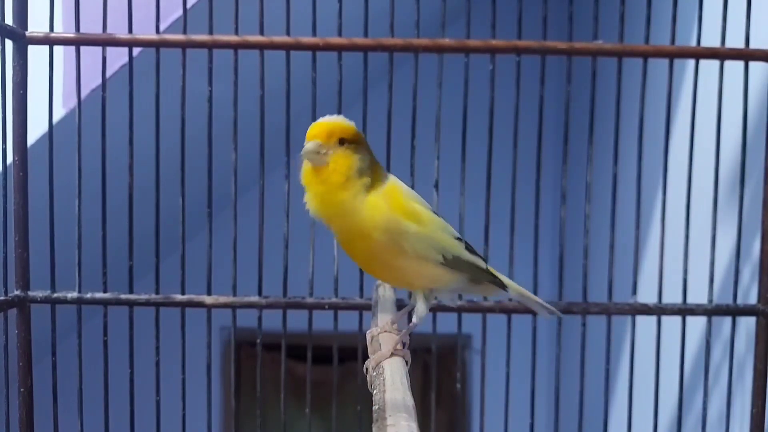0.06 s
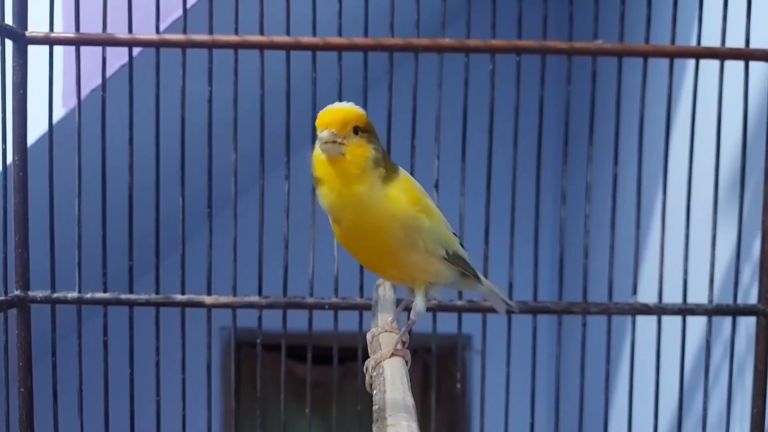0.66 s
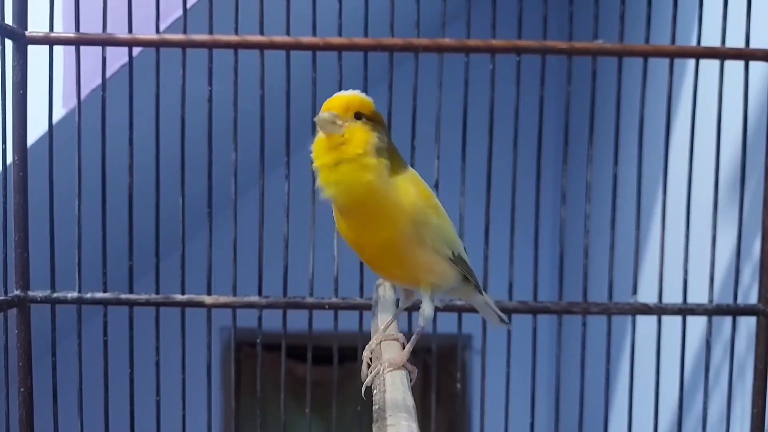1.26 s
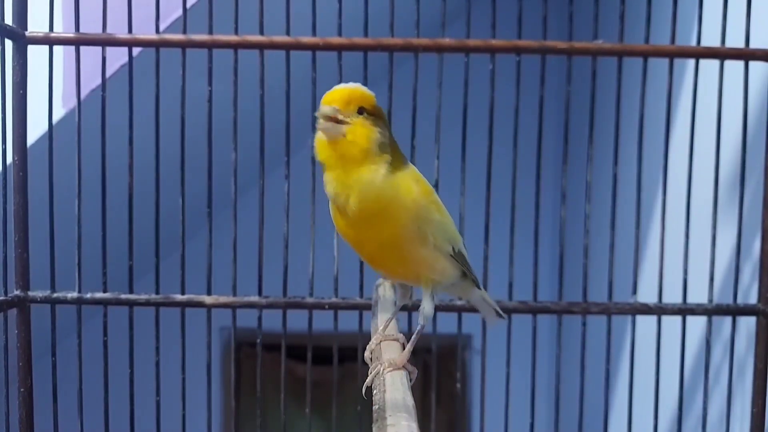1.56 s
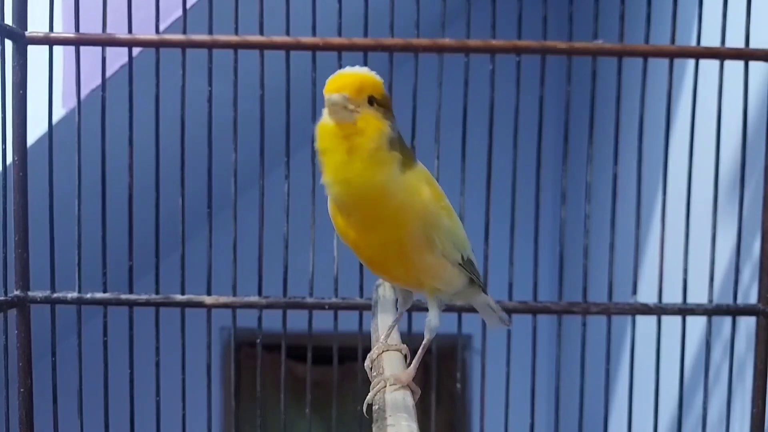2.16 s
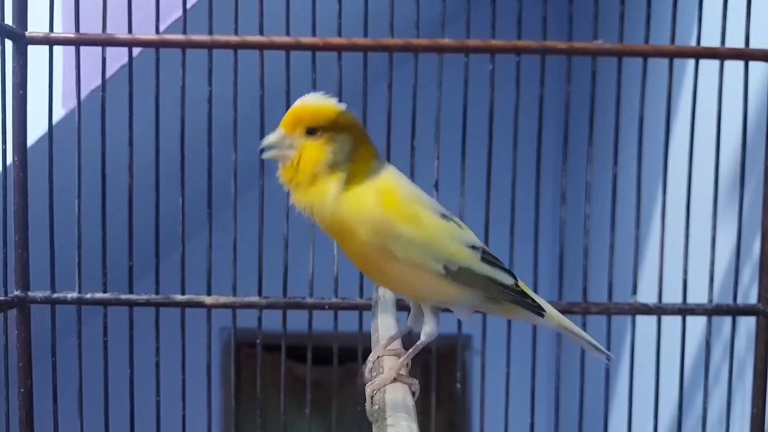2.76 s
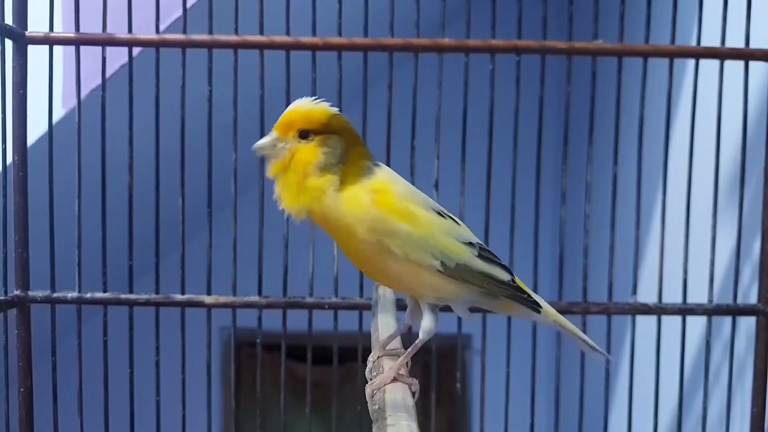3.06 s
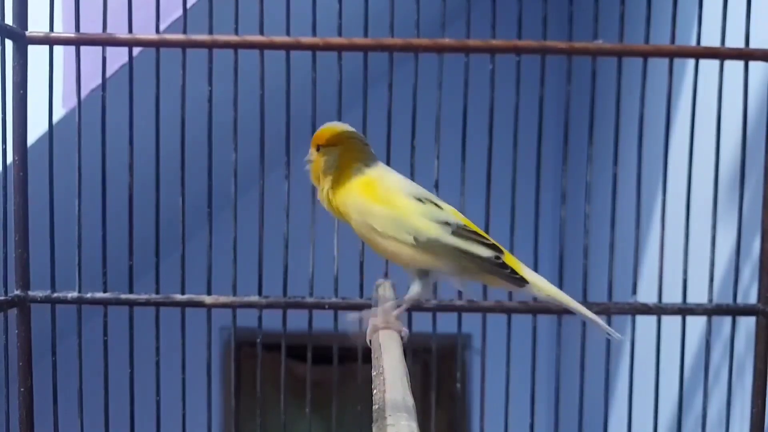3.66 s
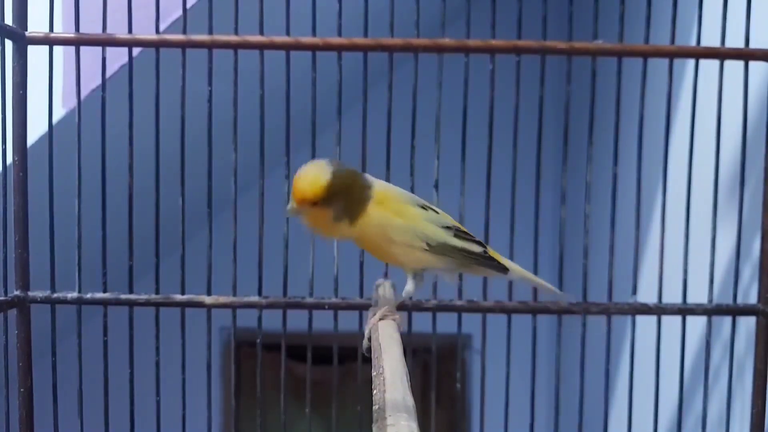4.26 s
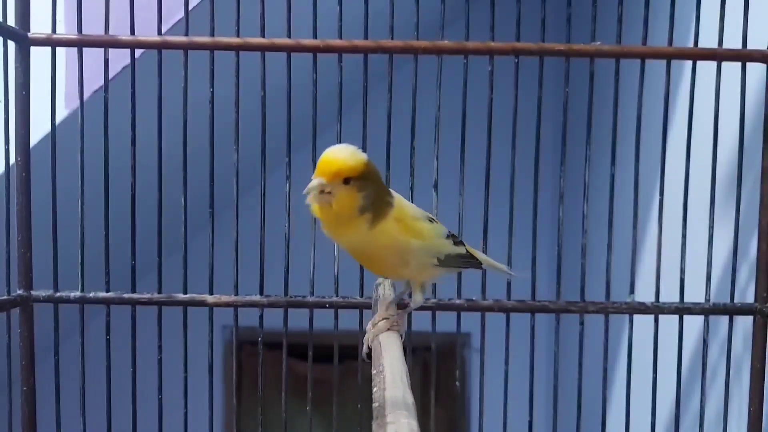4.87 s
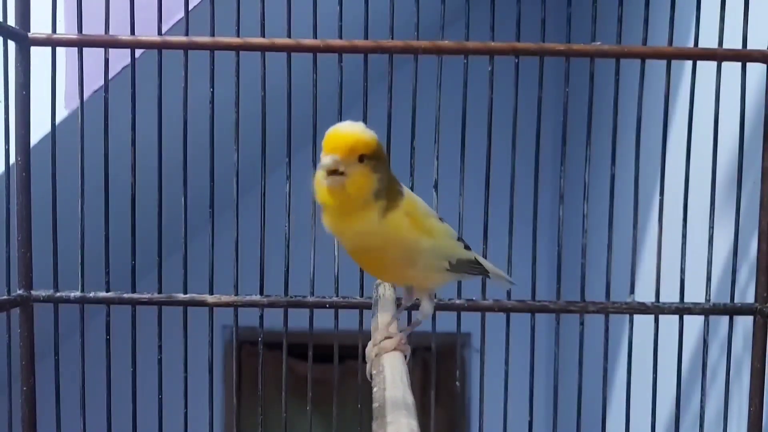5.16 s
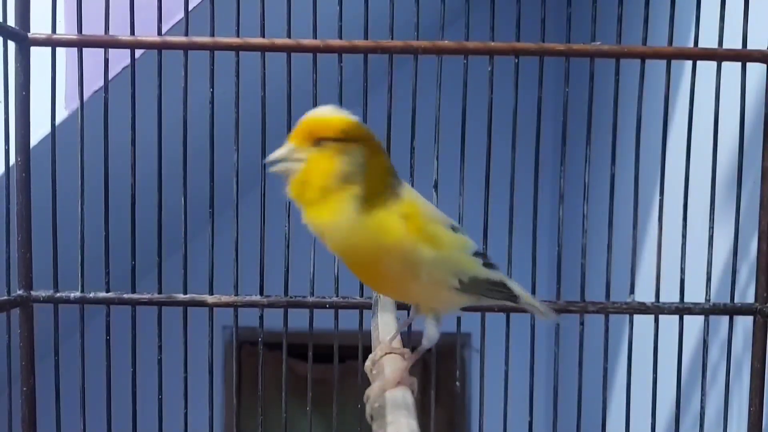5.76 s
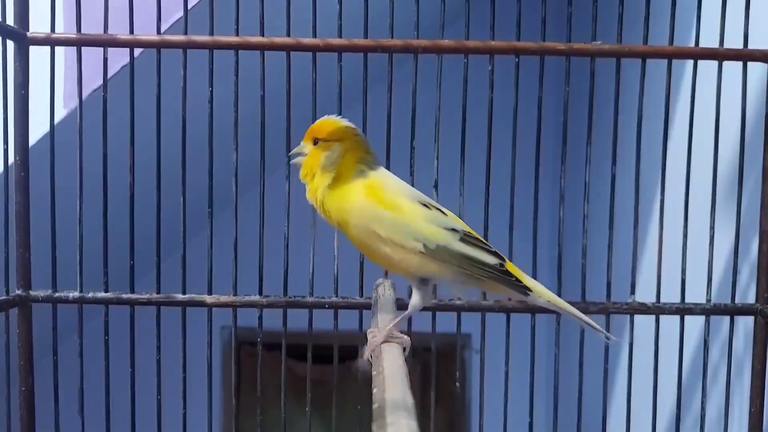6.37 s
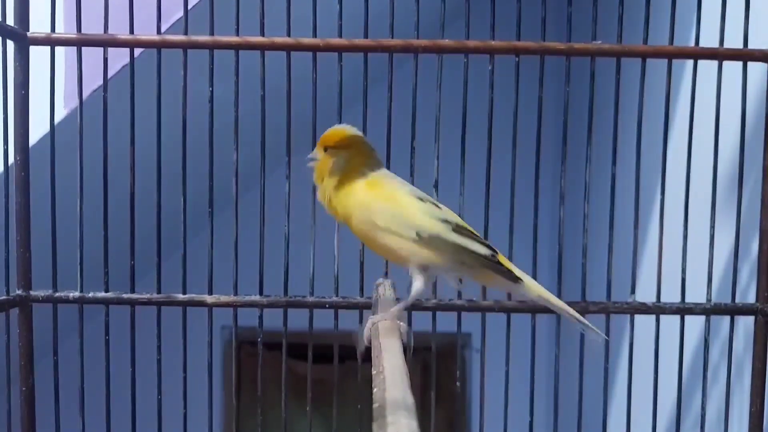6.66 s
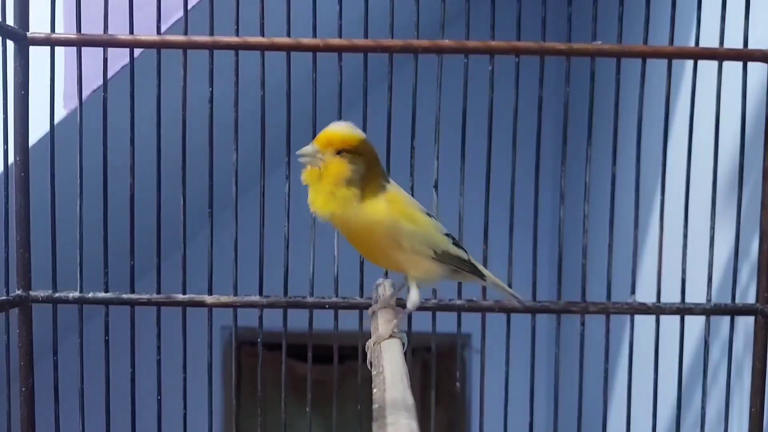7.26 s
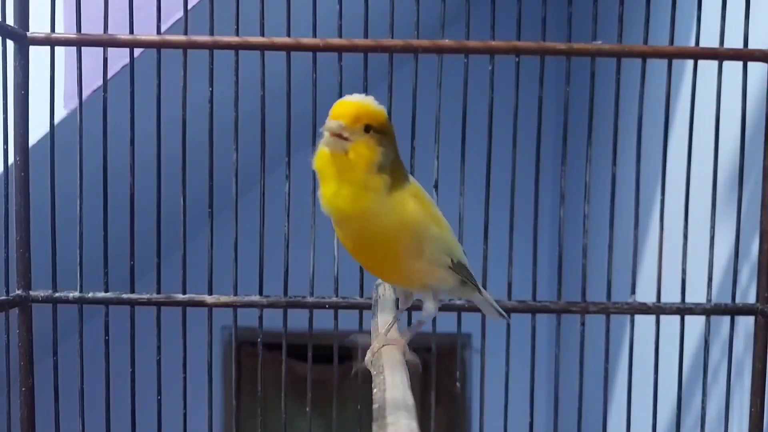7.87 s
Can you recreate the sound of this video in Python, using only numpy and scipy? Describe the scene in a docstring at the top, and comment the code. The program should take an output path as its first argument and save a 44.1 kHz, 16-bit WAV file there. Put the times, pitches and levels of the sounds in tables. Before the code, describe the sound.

Close, continuous canary song indoors moves from a rapid trill through falling chirps to long whistles, with light echo and quiet hum.

```python
"""A caged canary in a small room

The bird sings close by: a fast trill, a long run of steep down-sweeps, four rising whistles and
four slow falling ones. Each phrase repeats one learned syllable, a gliding tone of the syrinx
whose overtones are filtered by throat and beak, followed by the echoes of the room.
Mains hum, a drone, low rumble and faint hiss lie underneath, and a distant engine winds down."""
import sys
import numpy as np
from scipy import signal
from scipy.fft import rfft, irfft, next_fast_len
from scipy.io import wavfile
from scipy.ndimage import uniform_filter1d, map_coordinates

SR = 44100
rng = np.random.default_rng(int(sys.argv[2]) if len(sys.argv) > 2 else 0)


def put_to_file(sound):
    """Save the sound as 16-bit audio at rate SR, in the file named by the first command-line argument."""
    columns = np.atleast_2d(sound).T  # one column per channel
    safe = np.clip(columns, -1, 1)
    whole_steps = np.round(safe * 32767)
    wavfile.write(sys.argv[1], SR, whole_steps.astype(np.int16))


N = 357651


def amp(db):
    """Amplitude ratio of a level in decibels."""
    return 10 ** (np.asarray(db) / 20)


def unit(x):
    """Normalisation to an rms of 1."""
    return x / np.sqrt(np.mean(x ** 2) + 1e-20)


def along(points, hz):
    """Interpolation of (Hz, value) points on a logarithmic frequency axis."""
    freqs, values = np.transpose(points)
    return np.interp(np.log(hz + 1), np.log(freqs + 1), values)


def curves(rows, t):
    """Linear interpolation, at the times t, of each column after the time column."""
    times, *columns = np.transpose(rows)
    return [np.interp(t, np.sort(times), column) for column in columns]


def wobble(rate, size):
    """Random modulation: a smooth curve with `rate` knots a second."""
    knots = rng.standard_normal(int(size * rate / SR) + 4)
    return map_coordinates(knots, [np.arange(size) * rate / SR])


def filtered(x, response):
    """Zero-phase filtering: the spectrum times a frequency response."""
    size = next_fast_len(N + 8192)
    return irfft(rfft(x, size) * response(np.fft.rfftfreq(size, 1 / SR)), size)[..., :N]


def noise_pair(size, side_db):
    """Partly coherent stereo noise: a common part plus or minus a weaker side part."""
    mid, side = rng.standard_normal((2, size))
    return unit(np.array([mid + amp(side_db) * side, mid - amp(side_db) * side]))


def add(out, sound, s):
    """Superposition of a stereo sound, starting at s seconds."""
    start = round(s * SR)
    part = sound[:, max(-start, 0):max(N - start, 0)]
    out[:, max(start, 0):][:, :part.shape[1]] += part


def noise_bed(spectrum, side_db):
    """Spectral shaping: stereo white noise filtered to a spectrum, at an rms of 1."""
    return unit(filtered(noise_pair(N, side_db), lambda hz: amp(along(spectrum, hz))))


def hiss():
    """Stationary broadband noise, heard as a faint hiss."""
    # Each row: frequency in Hz, relative spectral density in dB.
    spectrum = [(500, -8.5), (1500, -9), (4000, -8), (8000, -24), (15000, -10.5)]
    return amp(-61) * noise_bed(spectrum, side_db=-7)


def rumble():
    """Low-frequency noise under a slow envelope."""
    # Each row: frequency in Hz, relative spectral density in dB.
    spectrum = [(25, -21.5), (48, -10), (78, -5), (100, -5.5), (118, -2), (135, -13), (179, -3.5),
                (209, -10.5), (302, -12), (358, -17.5), (527, -29.5), (1400, -44.5), (3000, -91)]
    # Each row: time in seconds, level in dB.
    envelope = [(0, -50), (1.4, -51), (2.2, -48.5), (4.1, -48), (5.9, -53), (8.1, -55.5)]
    db, = curves(envelope, np.arange(N) / SR)
    return amp(db) * noise_bed(spectrum, side_db=-13)


def low_tone(hz, envelope, waver_db, drift_rad):
    """A sinusoid under random amplitude and phase modulation."""
    t = np.arange(N) / SR
    db, = curves(envelope, t)
    peak = np.sqrt(2) * amp(db + waver_db * wobble(10, N))
    return peak * np.sin(2 * np.pi * hz * t + drift_rad * wobble(2.7, N))


def hum():
    """Two wavering spectral lines: a low drone, and mains hum at twice the supply frequency."""
    # Each row of both: time in seconds, relative level in dB.
    drone_envelope = [(0, -54), (.9, -59), (1.3, -70), (1.6, -48.5), (4, -52.5), (5, -57), (6.3, -48.5),
                      (8, -50)]
    mains_envelope = [(0, -48.5), (1.1, -67), (2.7, -49), (4.2, -47.5), (5.4, -52), (8, -52.5)]
    drone = low_tone(59.9, drone_envelope, waver_db=4.5, drift_rad=1.8)
    mains = low_tone(99.9, mains_envelope, waver_db=3, drift_rad=0.94)
    return amp(-3) * drone + amp(-0.5) * mains


def engine(idle_hz=36, sag_hz_per_s=13.5, attack_db_per_s=134, release_db_per_s=32, rough_rad=1.1):
    """Exhaust harmonics of a distant engine: each of two revs swells, sags towards idle and fades."""
    # Each row: time of full level in seconds, firing rate then in Hz, hold in seconds, level in dB.
    revs = [(1.46, 50.67, 0.16, -46.5), (2.02, 52.27, 0.39, -44.5)]
    # Each row: multiple of the firing rate, relative level in dB.
    exhaust = [(3, -24), (4, -7.5), (5, 9), (6, -14.5), (7, -29), (8, -8), (9, -15), (10, -10.5)]
    out = np.zeros(N)
    for s, firing_hz, hold_s, db in revs:
        t = np.arange(N) / SR - s
        hz = np.maximum(firing_hz - sag_hz_per_s * t, idle_hz)
        phase = 2 * np.pi * np.cumsum(hz) / SR
        orders = np.zeros(N)
        for multiple, order_db in exhaust:
            gain = amp(order_db + 2.5 * wobble(32, N))
            orders += gain * np.sin(multiple * phase + rough_rad * wobble(23, N))
        fade_db = attack_db_per_s * np.maximum(-t, 0) + release_db_per_s * np.maximum(t - hold_s, 0)
        out += amp(db - fade_db) * unit(orders)
    return out * amp([[-4.8], [3]])


def room_tail(build_s=0.00051):
    """Diffuse reverberation: noise decays exponentially in each band, the lows most slowly."""
    # Each row: frequency in Hz, reverberation time (T60) in seconds.
    decay_times = [(1000, 0.43), (3000, 0.26), (5000, 0.34), (7000, 0.26), (15000, 0.31)]
    # Each row: frequency in Hz, gain in dB.
    colour = [(1000, 3.5), (3000, 0.5), (4500, -4.5), (7000, 2.5), (9000, 3.5), (15000, 2)]
    hz, t, bands = signal.stft(noise_pair(SR // 3, side_db=-2.5), SR, nperseg=256)
    decay = amp(-60 * t / along(decay_times, hz)[:, None])
    _, tail = signal.istft(bands * decay, SR, nperseg=256)
    size = tail.shape[1]
    tail *= 1 - np.exp(-np.arange(size) / (SR * build_s))
    tail /= np.linalg.norm(tail[0])
    return irfft(rfft(tail) * amp(along(colour, np.fft.rfftfreq(size, 1 / SR))))


def ringing(size):
    """Normal modes of cage and room: damped sinusoids that a passing sweep excites."""
    # Each row: frequency in Hz, level in dB, decay time (T60) in seconds.
    modes = [(2352, -52, .35), (2894, -57.5, 0.32), (3250, -55.5, 0.36), (4237, -54, 0.32), (5890, -61, .3),
             (6860, -57.5, 0.23)]
    t = np.arange(size) / SR
    return sum(amp(db - 60 * t / t60) * np.sin(2 * np.pi * hz * t) for hz, db, t60 in modes)


def in_room(note, tail, right_db, flutter_hz=170.5, first_bounce=0.15, bounce_gain=0.74):
    """Convolution with the direct path, early echoes, flutter between parallel walls and the tail."""
    # Each row: delay in seconds, gain as an amplitude ratio.
    early_echoes = [(.0023, 0.032), (0.0156, 0.11)]
    direct = [(0.00034, 0.92)]
    flutter = [(k / flutter_hz, first_bounce * bounce_gain ** (k - 1)) for k in range(1, 12)]
    response = tail * amp([[-right_db / 3], [right_db / 3]])
    for s, gain in direct + early_echoes + flutter:
        response[:, round(s * SR)] += gain * amp([-right_db / 2, right_db / 2])
    return signal.fftconvolve(note[None], response, axes=1)


def syrinx(shape, stretch, bright_db, pitch=1, range_db=(0, 0, 0), waver=0.0025, rasp_db=-48):
    """Source and filter: a gliding whistle with breath noise, its overtones shaped by throat and beak."""
    # Relative levels in dB of the second, third and fourth harmonics, before the throat.
    overtones = [8.5, -1, -14.5]
    # Each row: frequency in Hz, gain of throat and beak for the overtones in dB.
    throat = [(2000, -48), (6000, -52.5), (8000, -40.5), (9500, -27.5), (11000, -23.5), (13000, -27.5),
              (14500, -12.5), (15500, -18)]
    # Air at the syrinx. Each row: frequency in Hz, relative spectral density in dB.
    rasp = [(500, -17.5), (1200, -16), (2500, 1), (5000, -11), (8000, 0), (10000, -2), (15000, 0.5)]
    t = np.arange(shape[0][0], shape[-1][0], 1 / (SR * stretch))
    size = len(t)
    hz, db = (uniform_filter1d(c, size=70, mode="nearest") for c in curves(shape, t))
    # The two sides of the syrinx share the range, so its parts vary in strength on their own.
    high_db, mid_db, low_db = range_db
    db = db + along([(3200, low_db), (3800, 0), (4300, 0), (4700, mid_db), (5900, high_db)], hz)
    hz = hz * pitch * (1 + waver * wobble(246.6, size))
    phase = 2 * np.pi * np.cumsum(hz) / SR
    tone = np.sin(phase)
    for multiple, source_db in enumerate(overtones, 2):
        overtone_db = source_db + bright_db + along(throat, multiple * hz) + 4.4 * wobble(93.8, size)
        anti_alias = np.clip((SR / 2 - multiple * hz) / (SR / 10), 0, 1)
        tone += amp(overtone_db) * np.sin(multiple * phase) * anti_alias
    air_spectrum = rfft(rng.standard_normal(size)) * amp(along(rasp, np.fft.rfftfreq(size, 1 / SR)))
    tone += amp(rasp_db + bright_db) * unit(irfft(air_spectrum, size))
    edges = signal.windows.tukey(size, 0.066)  # long notes start and end more softly
    return tone * edges * amp(db + 1.5 * wobble(119, size))


def beats(tempo, count):
    """Repetition with a changing period: the time of each syllable and the spacing to the next."""
    s = tempo[0][0]
    for _ in range(count):
        spacing, = curves(tempo, s)
        yield s, spacing
        s = s + spacing


def trill(sing, nominal_period_s=0.058, accent_s=0.0128, length_scatter=0.05):
    """Rapid frequency modulation: short falling strokes slow down and end in one longer linking note."""
    # Each row of both: time in the syllable in seconds, pitch in Hz, relative level in dB.
    stroke = [(-.002, 6930, -29), (.001, 6500, -11.5), (.0045, 5720, -18.5), (.008, 4870, -2),
              (.013, 4320, 0.5), (.018, 3570, 1), (0.021, 3330, -13), (.0235, 3230, -30)]
    link = [(0, 6920, -5.5), (.004, 6180, -11.5), (.012, 5160, -12.5), (.022, 4550, -9), (.040, 4170, -21),
            (.058, 3380, -7), (.072, 2750, -4.5), (.080, 1974, -14), (.088, 955, -30)]
    # Each row: time in seconds, syllable spacing in seconds.
    tempo = [(.0115, .04475), (.8155, .05016), (1.023, .05475)]
    # Each row: time in seconds, level in dB.
    effort = [(0, -13), (.82, -12.7), (1.08, -15)]
    for s, spacing in beats(tempo, count=23):
        stretch = spacing / nominal_period_s * (1 + length_scatter * rng.standard_normal())
        db, = curves(effort, s)
        sing(stroke, s - accent_s * stretch, db, stretch, shine_db=-1, waver=0.0035, rasp_db=-22.5)
    sing(link, 1.116, db=-14, rasp_db=-23.5)


def sweeps(sing, nominal_period_s=0.1326, accent_s=0.067, scatter_db=1.2):
    """Steep downward chirps in a run that swells twice; wider spacing makes them longer and higher."""
    # Each row: time in the syllable in seconds, nominal pitch in Hz, relative level in dB.
    sweep = [(0, 4983, -11.5), (.004, 6643, -18.5), (.008, 7176, -14.5), (.014, 6810, -14),
             (.023, 6003, -7), (.036, 5420, -28.5), (.044, 5064, -16.5), (.051, 4752, -3),
             (.058, 4437, -13.5), (.067, 4060, 2), (.075, 3630, -8.5), (.083, 3246, -1.5), (.091, 2800, 1),
             (.097, 1825, -12.5), (.101, 1390, -29), (.107, 793, -23)]
    # Each row: time in seconds, syllable spacing in seconds.
    tempo = [(1.2895, .12544), (2.047, .12731), (2.963, .13563), (5.112, .13287), (5.65, .13742)]
    # Each row: time in seconds, level in dB, then extra dB for the high, middle and low range.
    effort = [(1.29, -14, -1, 0, 0.5), (1.6, -12, -2, 0.5, -1.4), (2.42, -11, -3, 3, -1),
              (2.65, -10.5, -3.5, -3.5, -2.5), (3.4, -14.5, 0.5, -4.5, -1.7), (3.9, -16.5, -4, 1, -2.5),
              (4.45, -17.5, 0.5, -3.5, -0.8), (4.85, -11.5, -0.9, 0, -1.5), (5.78, -8, -2.6, -4.5, -3)]
    # Each row: time in seconds, gain of overtones and rasp in dB.
    shine = [(1.3, -2.5), (3, -2), (4.7, 0.5)]
    for s, spacing in beats(tempo, count=35):
        stretch = (spacing / nominal_period_s) ** 1.5
        db, *range_db = curves(effort, s)
        range_db = range_db + scatter_db * rng.standard_normal(3)  # no two swell alike
        shine_db, = curves(shine, s)
        sing(sweep, s - accent_s * stretch, db, stretch, shine_db,
             pitch=1.0015 * stretch ** 0.42, range_db=range_db, waver=0.0042, rasp_db=-20)


def whistles(sing):
    """Slow glides of a nearly pure tone: a rising lead-in, three more rises, then four falls."""
    # Each row of all three: time in the syllable in seconds, nominal pitch in Hz, relative level in dB.
    lead_in = [(0, 3600, -13), (.018, 3860, -4), (.036, 4540, 3.5), (.055, 4820, -3), (.085, 4870, -12.5),
               (.115, 5080, -8), (.145, 5105, -6), (.18, 5085, -12.5), (.195, 5180, -27)]
    rise = [(-.007, 1390, -13), (0, 2510, -14.5), (.008, 3065, -10.5), (.018, 3226, -6.5),
            (.040, 3670, -1.5), (0.071, 4210, -3), (.100, 4570, -5.5), (.130, 4860, -9), (.180, 4990, -8.5),
            (.230, 5035, -7), (.278, 5050, -14), (.292, 4780, -27)]
    fall = [(0, 4956, -2.5), (.006, 7140, -16), (.013, 7520, -14.5), (.025, 6750, -12), (.039, 6020, -21.5),
            (.056, 5430, -13), (.072, 4960, -3), (.100, 4280, -3), (.130, 3880, 1.5), (.170, 3522, -1),
            (.210, 3230, -3), (.247, 3069, -1), (.28, 3070, -21)]
    # Each row: start in seconds, duration factor, hold on the crest in unstretched seconds, level in dB.
    rises = [(6.084, 0.83, 0.015, -12), (6.371, 0.86, 0.0053, -13), (6.6596, 0.866, 0, -14)]
    # Each row: start in seconds, duration factor, pitch factor, level in dB.
    falls = [(6.9447, 0.91, 1.003, -13.5), (7.2373, 1.002, 0.98, -11), (7.55, 1.02, 0.9814, -11),
             (7.8627, 1.082, 0.99, -10)]
    sing(lead_in, 5.862, db=-15, shine_db=1, waver=0.0013)
    for s, stretch, hold_s, db in rises:
        release = [(t + hold_s, hz, level) for t, hz, level in rise[-2:]]
        sing(list(rise[:-2]) + release, s, db, stretch, shine_db=1.5, waver=0.0015)
    for s, stretch, pitch, db in falls:
        sing(fall, s, db, stretch, shine_db=0.2, pitch=pitch, waver=0.0014, rasp_db=-48.5)


def canary(moving_share=0.23):
    """A directional source in a room: as the bird turns away, its song dulls and reverberation grows."""
    # Each row: time in seconds, turn from 0 (facing the listener) to 1 (averted).
    turning = [(0, 0.32), (2.2, 0.15), (3.2, 0.27), (4, 0.97), (4.7, 0.48), (5.6, 0.032), (6.6, 0.83),
               (7.3, 0.39), (8, 0.21)]
    # Each lists, in dB: gain of overtones and rasp, right over left, gain of the reverberation.
    facing_db = [-3, 1.3, -6]
    averted_db = [-7, 4, 2.3]
    # Each row: frequency in Hz, extra level of right over left in dB.
    balance = [(1200, -0.5), (2300, -1), (3100, 2.7), (4000, 1), (4800, 3), (6300, 1.5), (10000, -1),
               (15000, 0.5)]
    out = np.zeros((2, N))
    steady_tail = room_tail()
    steady_tail += ringing(steady_tail.shape[1])

    def sing(shape, s, db, stretch=1, shine_db=0, **voice):
        """Radiation of one syllable; part of the room's response is new each time, as the bird moves."""
        turn, = curves(turning, s)
        bright_db, right_db, wet_db = (1 - turn) * np.array(facing_db) + turn * np.array(averted_db)
        note = syrinx(shape, stretch, bright_db + shine_db, **voice)
        tail = np.sqrt(1 - moving_share) * steady_tail + np.sqrt(moving_share) * room_tail()
        add(out, amp(db) * in_room(note, amp(wet_db) * tail, right_db), s + shape[0][0] * stretch)

    trill(sing)
    sweeps(sing)
    whistles(sing)
    return filtered(out, lambda hz: amp(along(balance, hz) * np.array([[-0.5], [0.5]])))


def scene():
    """Superposition of the bird and the quiet background, whose low sounds lie to the right."""
    return canary() + (hum() + rumble()) * amp([[-4.6], [3]]) + hiss() + engine()


def record(dry):
    """Band limiting: an ideal low-pass filter at 15.8 kHz."""
    return filtered(dry, lambda hz: hz < 15800)


dry = scene()
out = record(dry)
put_to_file(out)
```